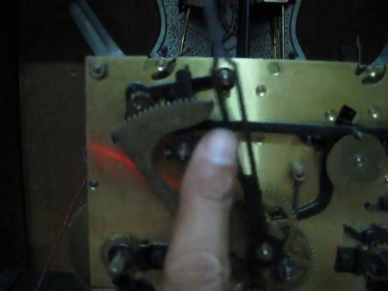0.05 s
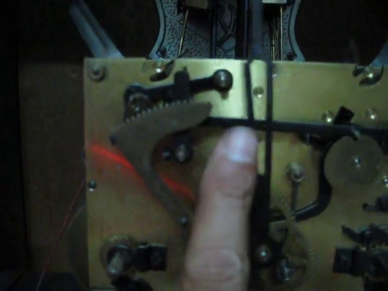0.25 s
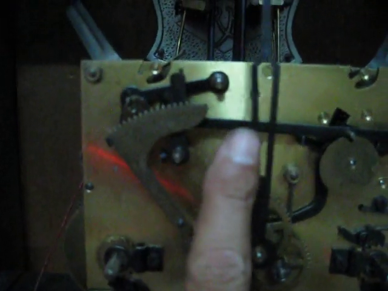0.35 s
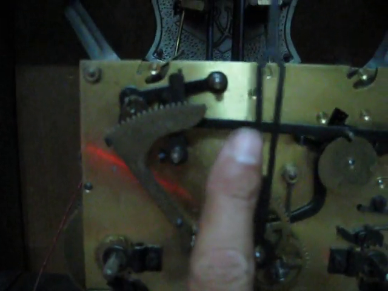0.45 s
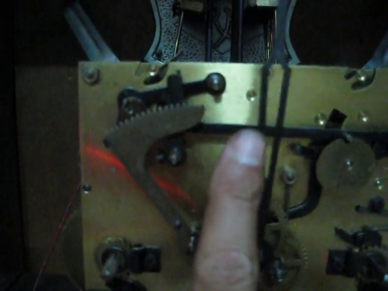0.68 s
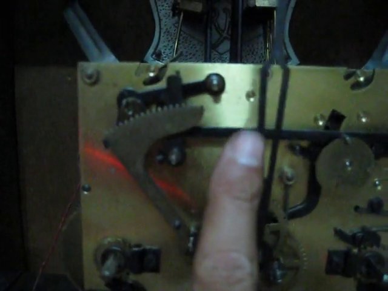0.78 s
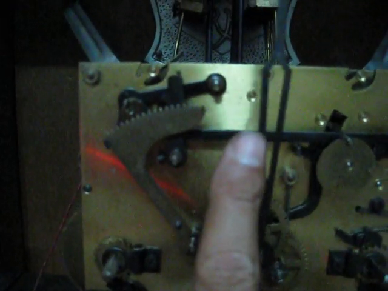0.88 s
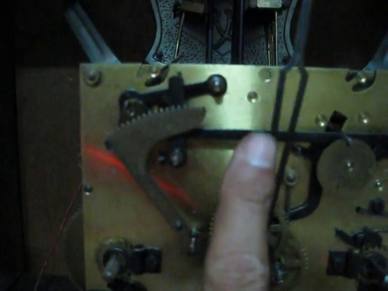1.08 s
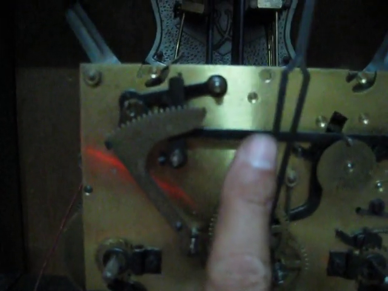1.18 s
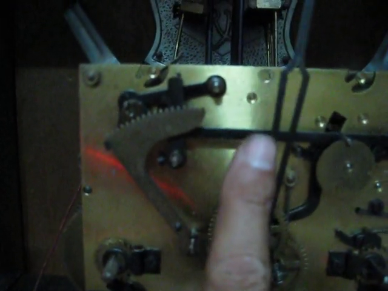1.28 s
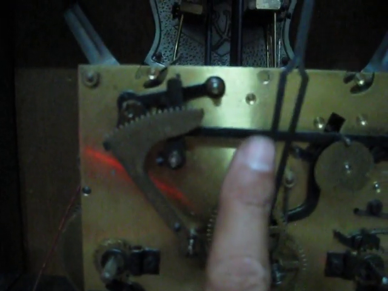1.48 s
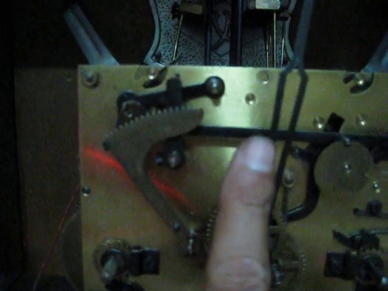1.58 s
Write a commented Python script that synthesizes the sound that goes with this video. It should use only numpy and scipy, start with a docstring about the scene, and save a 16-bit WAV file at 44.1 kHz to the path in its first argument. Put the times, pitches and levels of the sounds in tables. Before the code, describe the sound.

Close metallic clicks from a pendulum clock mechanism, one sharp snap, then faint whirring gears.

```python
"""A pendulum clock, with the microphone close to its open brass movement. A lever lifts with a soft
double click, then snaps down hard, steel on brass, and sets the wheel train whirring faintly: teeth
scrape and an arbor rubs in its pivot. The gong rods hum on from an earlier stroke, over the room's
hiss, mains hum and a deep rumble. The recorder's limiter ducks at the snap."""
import sys
import numpy as np
from scipy import signal
from scipy.fft import rfft, irfft, next_fast_len
from scipy.io import wavfile
from scipy.ndimage import uniform_filter1d

SR = 44100
rng = np.random.default_rng(int(sys.argv[2]) if len(sys.argv) > 2 else 0)


def store_pcm(level_fs):
    """Save levels as 16-bit WAV."""
    pcm = np.round(np.clip(level_fs, -1, 1) * 32767).astype(np.int16)
    wavfile.write(sys.argv[1], SR, np.atleast_2d(pcm).T)


N = 72765
T = np.arange(N) / SR


def amp(db):
    """Decibels to gain."""
    return 10 ** (np.asarray(db) / 20)


def curve(table, at, column=1):
    """Joins the rows of a table by straight lines."""
    rows = np.array(table, float)
    return np.interp(at, rows[:, 0], rows[:, column])


def spectrum(table, hz, column=1):
    """Reads a table on a log-frequency axis."""
    rows = np.array(table, float)
    return np.interp(np.log(hz + 1), np.log(rows[:, 0]), rows[:, column])


def colour(x, db_of):
    """Minimum-phase filter with the gain db_of(Hz)."""
    size = next_fast_len(2 * len(x))
    hz = abs(np.fft.fftfreq(size, 1 / SR))
    log_gain = np.log(amp(np.maximum(db_of(hz), -140)))
    response = np.exp(np.conj(signal.hilbert(log_gain)))
    return irfft(rfft(x, size) * response[:size // 2 + 1], size)[:len(x)]


def white():
    """Noise at 0 dB per Hz."""
    return rng.standard_normal(N) * np.sqrt(SR / 2)


def drift(rate_hz):
    """Slow random motion of unit rms."""
    rates = np.geomspace(rate_hz / 8, rate_hz, 16)
    x = sum(np.sin(2 * np.pi * (hz * T + rng.random())) / np.sqrt(hz) for hz in rates)
    return (x - x.mean()) / x.std()


def resonate(x, hz, width_hz):
    """One resonance, scaled to unit rms."""
    detuning = (np.fft.rfftfreq(N, 1 / SR) - hz) / width_hz
    y = irfft(rfft(x) / (1 + detuning ** 2), N)
    return y / y.std()


def tail(table):
    """Dense echoes, each band dying at its own speed."""
    hz, t, bands = signal.stft(white(), SR, nperseg=256)
    db, t60 = spectrum(table, hz[:, None]), spectrum(table, hz[:, None], column=2)
    return signal.istft(bands * amp(db - 60 * t / t60), SR, nperseg=256)[1][:N]


# gong rods inside the clock, still ringing (frequency [Hz], level [dB])
ROD_TONES = [(87.5, -64.5), (151, -58), (180, -61), (268, -61.5), (346.5, -57.5), (366.2, -55),
             (408.1, -45), (430.6, -49.5), (482.1, -51.5), (724, -67), (805, -67)]
# their ringing swells and sinks (time [s], level [dB])
ROD_SWELL = [(0, 1), (.17, -4), (.37, 1), (.52, -1), (.63, -3.5), (.8, 1.5), (1.05, -2), (1.27, 0),
             (1.45, -4), (1.65, 0)]


def gong_rods():
    """Rods struck earlier hold long, slightly wavering tones that beat against one another."""
    tones = np.zeros(N)
    for hz, db in ROD_TONES:
        gain = amp(db + 1.5 * drift(rate_hz=4.96))
        turns = hz * T + rng.random() + .05 * drift(rate_hz=5.77)
        tones += gain * np.sin(2 * np.pi * turns)
    return np.sqrt(2) * amp(curve(ROD_SWELL, T)) * tones


# mains hum in the room (time [s], level [dB])
MAINS_HUM = [(0, -56), (.12, -48), (.35, -46), (.52, -50.5), (.8, -55.5), (1.1, -49.5), (1.35, -53),
             (1.65, -61)]
# deep rumble at the microphone (time [s], level [dB])
RUMBLE = [(0, -64), (.25, -60), (.42, -63), (.6, -59), (.82, -63), (1.05, -59), (1.25, -49), (1.4, -57),
          (1.65, -60)]
# hiss of the room around the clock (frequency [Hz], level [dB per Hz])
ROOM_HISS = [(20, -84), (35, -85), (55, -110), (75, -81), (110, -68), (160, -77), (260, -79), (450, -81.5),
             (560, -87), (730, -81), (1100, -84), (2000, -86), (4000, -91.5), (6500, -98.5), (9000, -102),
             (12500, -101), (14500, -105), (15700, -101)]


def room_tone():
    """Steady hiss, a wavering mains hum and a deep rumble that comes and goes."""
    hum_phase = 2 * np.pi * 120 * T + .5 * drift(rate_hz=12)
    hum = np.sqrt(2) * amp(curve(MAINS_HUM, T)) * np.sin(hum_phase)
    rumble = amp(curve(RUMBLE, T)) * resonate(white(), hz=60, width_hz=7.8)
    hiss = colour(white(), lambda hz: spectrum(ROOM_HISS, hz))
    return hiss + hum + rumble


# steel on brass, from close up (frequency [Hz], relative level [dB])
CRACK_SPECTRUM = [(300, -64), (900, -63), (1200, -56), (1450, -60), (2100, -53), (2700, -44), (3400, -54),
                  (4400, -49), (4900, -50), (5500, -58), (6100, -51), (7000, -53), (9000, -55), (9900, -57),
                  (10600, -48), (12100, -48), (12700, -56), (13500, -39), (14300, -40), (14800, -54),
                  (16000, -68)]
CONTACT_RISE_S, CONTACT_HOLD_S, CONTACT_DECAY_S = .0006, .0014, .0008


def crack():
    """An even, broadband chatter during one brief contact, coloured by steel on brass."""
    release = np.exp(-np.clip(T - CONTACT_HOLD_S, 0, .1) / CONTACT_DECAY_S)
    contact = np.minimum(T / CONTACT_RISE_S, 1) * release
    burst = white() * contact
    for _ in range(3):  # flatten the spectrum while keeping the burst short
        flat = irfft(np.exp(1j * np.angle(rfft(burst))), N)
        burst = flat * np.sqrt(contact)
    burst *= np.sqrt(SR / 2 * np.sum(contact ** 2) / np.sum(burst ** 2))
    return colour(burst, lambda hz: spectrum(CRACK_SPECTRUM, hz))


# modes of the lever and plate (frequency [Hz], relative level [dB], t60 [s])
BRASS_MODES = [(650, -40, .2), (765, -36, .32), (1416, -46, .55), (1893, -43, .6), (1914, -40.5, .65),
               (2710, -17, .05), (2724, -38, .4), (2806, -19, .07), (2818, -41, .45), (2878, -21, .07),
               (2896, -40, .6), (3232, -28, .08), (3338, -47, .4), (3946, -42, .45), (4463, -42, .55),
               (4576, -44, .55), (4613, -40, .3), (4764, -38, .35), (4905, -22, .07), (4917, -43, .6),
               (11525, -21, .025), (12200, -23, .022), (13585, -10, .011), (14275, -6, .011)]
# the room's answer, heard from beside the clock (frequency [Hz], relative level [dB], t60 [s])
ROOM_ECHOES = [(220, -62, 0.51), (453, -65.5, 0.51), (750, -69, 0.54), (1300, -63.5, 0.4),
               (1670, -85, 0.84), (1920, -69, 1), (2210, -79, .8), (2770, -65, 0.72), (3200, -75, .8),
               (3800, -65.5, 0.69), (4870, -71, 0.76), (5160, -76, 0.68), (6900, -76.5, 0.57),
               (9000, -79, 0.52), (12500, -77.5, 0.47), (14400, -74.5, 0.47), (15200, -84, .42)]


def brass_ring():
    """Struck brass rings, each mode dying at its own speed, as the room's echoes build behind it."""
    modes = sum(amp(db - 60 * T / t60) * np.sin(2 * np.pi * (hz * T + rng.random()))
                for hz, db, t60 in BRASS_MODES)
    echoes = tail(ROOM_ECHOES) * (1 - np.exp(-T / .014))
    return modes * np.minimum(T / CONTACT_RISE_S, 1) + echoes


# modes of the lifting arm (frequency [Hz], relative level [dB], t60 [s])
ARM_MODES = [(420, -38, .04), (1850, -48, .04), (2234, -43, .035), (2413, -37, .05), (2530, -43, .03),
             (2712, -39, .045), (2930, -46, .035), (3315, -46, .04), (4240, -53, .04), (4630, -55, .04),
             (5990, -57, .04)]


def arm_clack(rise_s=.0003):
    """The lifting arm's modes start together and die fast, damped by a finger."""
    modes = sum(amp(db - 60 * T / t60) * np.sin(2 * np.pi * hz * T) for hz, db, t60 in ARM_MODES)
    return modes * np.minimum(T / rise_s, 1)


# early reflections inside the clock case (frequency [Hz], relative level [dB], t60 [s])
CASE_ECHOES = [(150, -63, 0.15), (895, -69, 0.13), (1230, -63.5, 0.14), (2600, -55.5, 0.078),
               (3460, -59, 0.059), (4560, -52, 0.051), (5900, -58, 0.062), (11000, -57, 0.037),
               (13900, -62, 0.05), (16000, -63, .04)]
# lever contacts close to the microphone, with a gain for each part # (time [s], crack [dB], case echoes [dB],
# brass and room [dB], arm clack [dB], treble shelf [dB])
LEVER_CONTACTS = [(.2264, -23, -17.5, -44, -13, -12.5), (0.2272, -26, -19.5, -48, -2.5, -15),
                  (.2318, -28, -19.5, -50, -10, -6), (0.2438, -32, -33, -27, 0, -20),
                  (.417, -54, -39.5, -48, -40, 8.5), (.5503, -3.5, -2.5, -3.5, -3, 3.5),
                  (0.5522, -2.5, -12, -25, -3, -3), (.5580, -23, -16, -23, -14, -2),
                  (.5640, -20, -16, -24, -4, -7), (1.223, -50, -30.5, -45, -20, -12),
                  (1.231, -52, -28.5, -51, -20, -4.5), (1.2755, -62, -28.5, -36, -15, -2)]
TREBLE_RAMP_HZ = (4800, 8500)


def lever():
    """Each contact cracks, echoes briefly inside the case, rings the brass and makes the lifting arm clack."""
    out = np.zeros(N)
    ring, clack = brass_ring(), arm_clack()
    for time_s, crack_db, case_db, ring_db, arm_db, treble_db in LEVER_CONTACTS:
        click = amp(crack_db) * crack() + amp(case_db) * tail(CASE_ECHOES)
        click += amp(ring_db) * ring + amp(arm_db) * clack
        click = colour(click, lambda hz: np.interp(hz, TREBLE_RAMP_HZ, [0, treble_db]))
        start = round(time_s * SR)
        out[start:] += click[:N - start]
    return out


# the wheel train's run in the open movement (time [s], rate [teeth per s], level [dB])
TRAIN_RUN = [(.74, 121, -7), (.84, 124, -1), (.93, 131, 2.5), (.99, 120, 3), (1.06, 133, -1),
             (1.09, 134, -8), (1.21, 138, -3), (1.33, 140, -5), (1.42, 140, -3), (1.49, 130, 1),
             (1.65, 144, -1)]
# meshing teeth, from close up (frequency [Hz], relative level [dB])
TOOTH_SPECTRUM = [(1000, -100), (2200, -96), (3400, -86), (4300, -98), (5500, -100), (6500, -101),
                  (7300, -91.5), (9000, -98), (10000, -101), (10800, -100.5), (12000, -103), (14000, -102),
                  (15500, -107)]
TOOTH_DECAY_S, TOOTH_SCATTER_DB, JITTER_TEETH = .0024, 1.8, .11


def wheel_train():
    """One tiny scrape per tooth as the train gathers speed, with a pivot rasping in step."""
    rate = curve(TRAIN_RUN, T)
    teeth_passed = abs(np.cumsum(rate) / SR + JITTER_TEETH * drift(rate_hz=60))
    strength = amp(TOOTH_SCATTER_DB * rng.standard_normal(N))[teeth_passed.astype(int)]
    since_tooth_s = (teeth_passed % 1) / rate
    scrapes = strength * np.exp(-since_tooth_s / TOOTH_DECAY_S)
    scrapes /= np.sqrt(np.mean(scrapes ** 2))
    gain = amp(curve(TRAIN_RUN, T, column=2)) * (T > TRAIN_RUN[0][0])
    mesh = colour(white() * scrapes * gain, lambda hz: spectrum(TOOTH_SPECTRUM, hz))
    return mesh + pivot_rub(scrapes)


# the pivot's two notes (frequency [Hz], half-width [Hz])
PIVOT_NOTES = [(2920, 68), (4195, 75)]
# their strength at the microphone (time [s], low note level [dB], high note level [dB])
PIVOT_LEVELS = [(.7, -51, -72), (.8, -59.5, -63), (.84, -53.5, -62), (.93, -47, -65), (1.005, -58.5, -60),
                (1.06, -59.5, -68), (1.35, -62, -67), (1.45, -61, -65), (1.65, -63, -63)]


def pivot_rub(scrapes, pulsing=.5):
    """The spinning arbor rubs in its pivot: two thin notes from friction that pulses with the teeth."""
    friction = white() * (1 - pulsing + pulsing * scrapes)
    notes = sum(amp(curve(PIVOT_LEVELS, T, column)) * resonate(friction, hz, width_hz)
                for column, (hz, width_hz) in enumerate(PIVOT_NOTES, start=1))
    return notes * (T > PIVOT_LEVELS[0][0])


def scene():
    """The clock in its room, in mono from one close position."""
    return (lever() + wheel_train() + gong_rods() + room_tone())[None]


NOTCH_HZ, NOTCH_WIDTH_HZ, NOTCH_DB = 7900, 455, -17.5
THRESHOLD_DB, LIMIT_SHARE, PEAK_FALL_DB_PER_S = -23, .36, 302
CEILING, BAND_EDGE_HZ = .8, 15780


def record(dry):
    """A notch in the microphone's treble, then a quick limiter, soft overload and the band limit."""
    x = colour(dry[0], lambda hz: NOTCH_DB * np.exp(-((hz - NOTCH_HZ) / NOTCH_WIDTH_HZ) ** 2))
    power_db = 10 * np.log10(abs(uniform_filter1d(x ** 2, size=88)) + 1e-12)
    fall_db = T * PEAK_FALL_DB_PER_S
    peak_db = np.maximum.accumulate(power_db + fall_db) - fall_db  # jumps up, sinks steadily
    excess_db = np.maximum(peak_db - THRESHOLD_DB, 0)
    x = x / amp(LIMIT_SHARE * uniform_filter1d(excess_db, size=66))
    x = CEILING * np.tanh(x / CEILING)
    lowpass = signal.firwin(401, BAND_EDGE_HZ, window=("kaiser", 9), fs=SR)
    return signal.oaconvolve(x, lowpass, "same")[None]


dry = scene()
out = record(dry)
store_pcm(out)
```